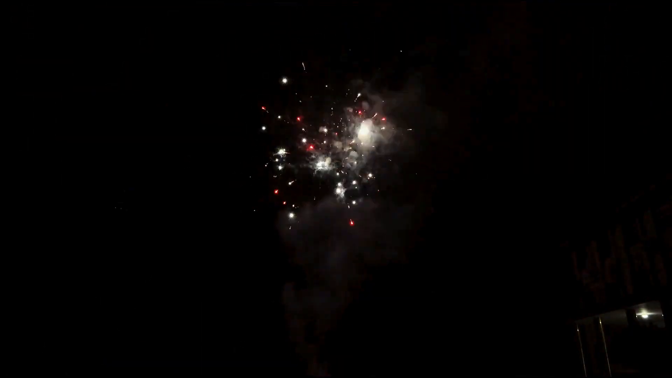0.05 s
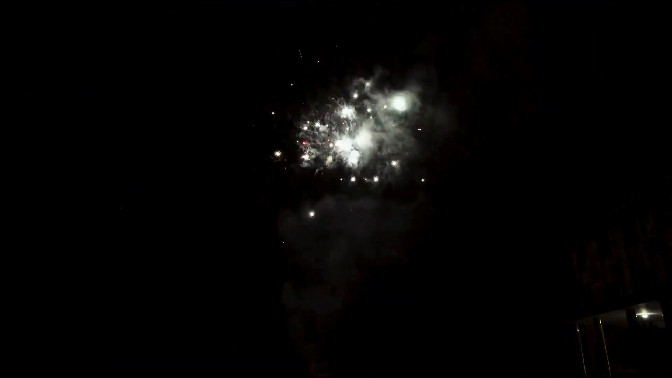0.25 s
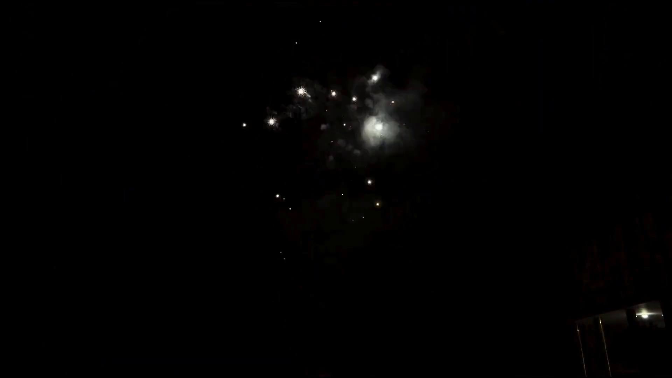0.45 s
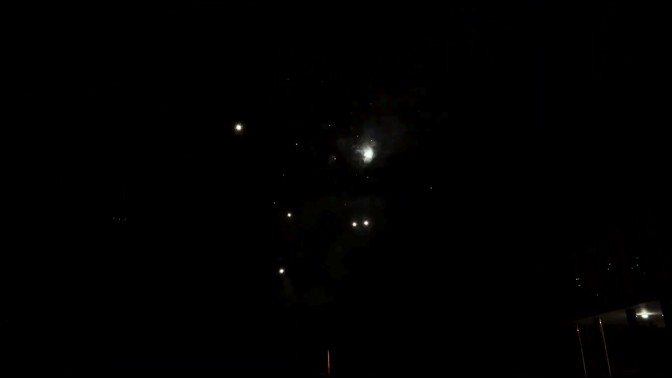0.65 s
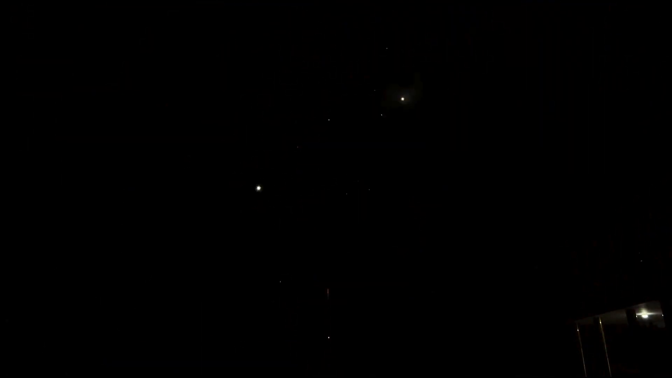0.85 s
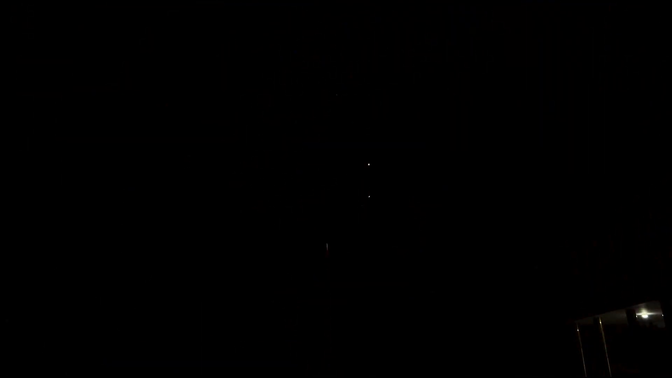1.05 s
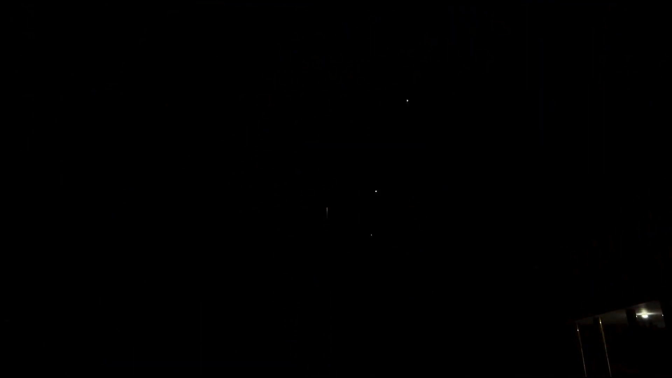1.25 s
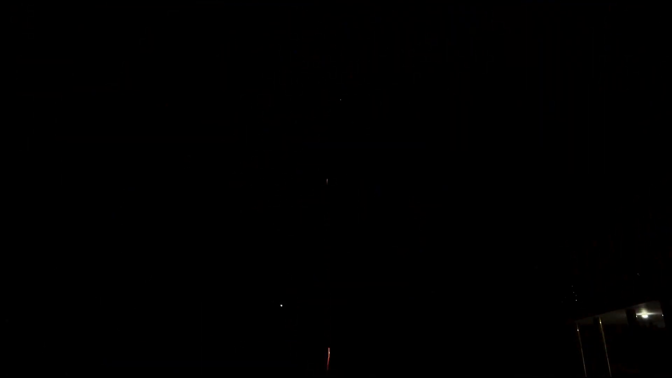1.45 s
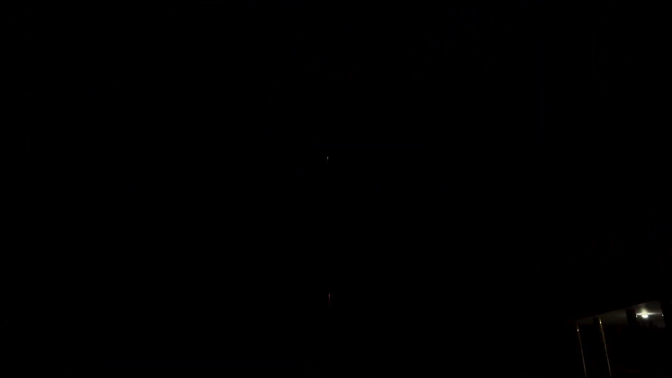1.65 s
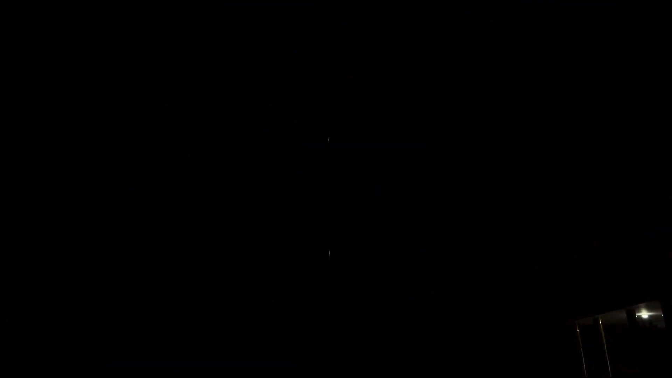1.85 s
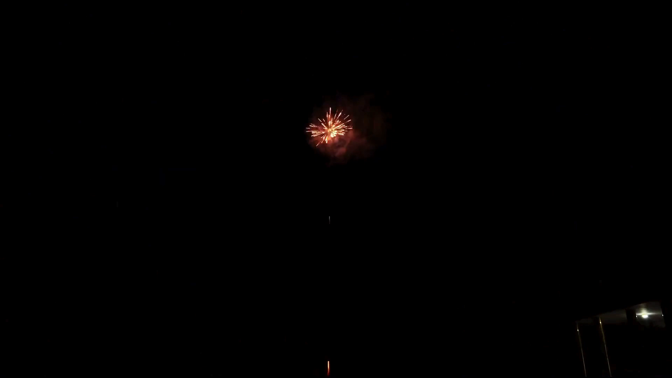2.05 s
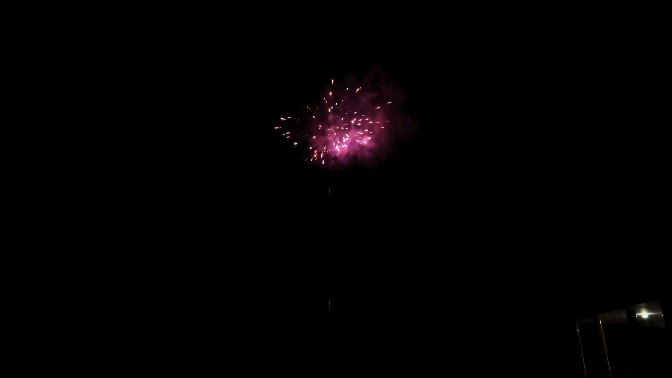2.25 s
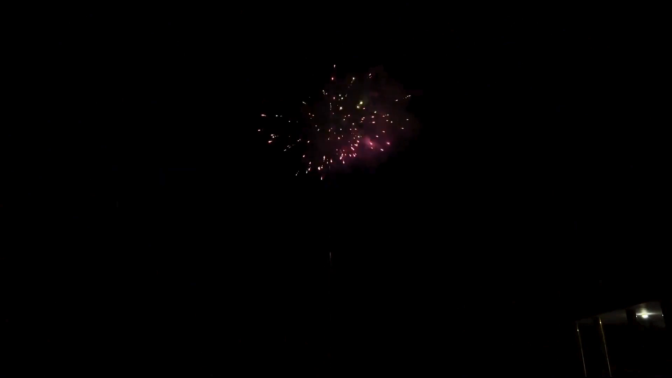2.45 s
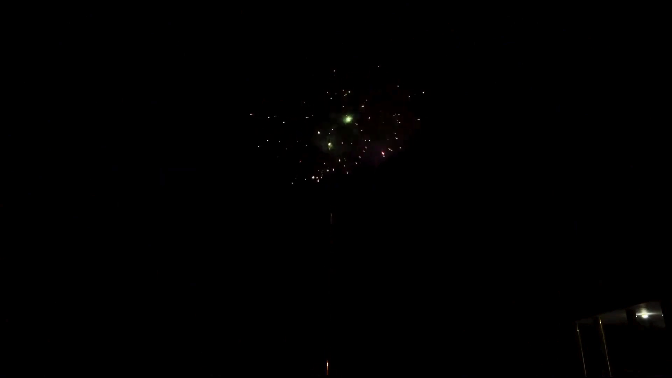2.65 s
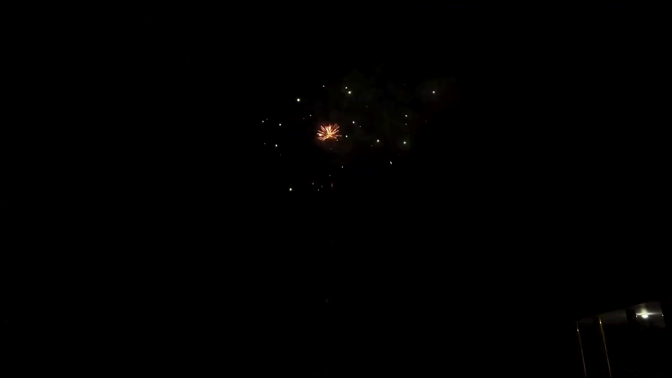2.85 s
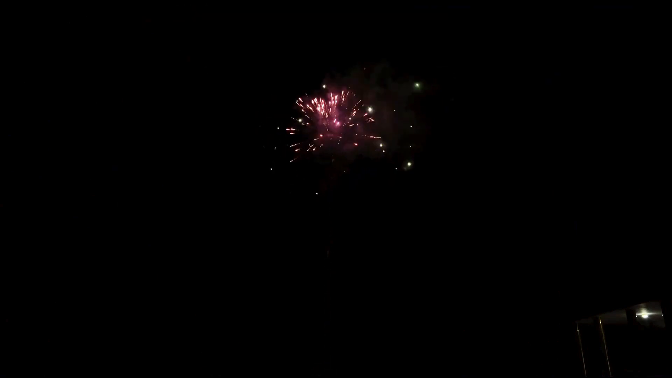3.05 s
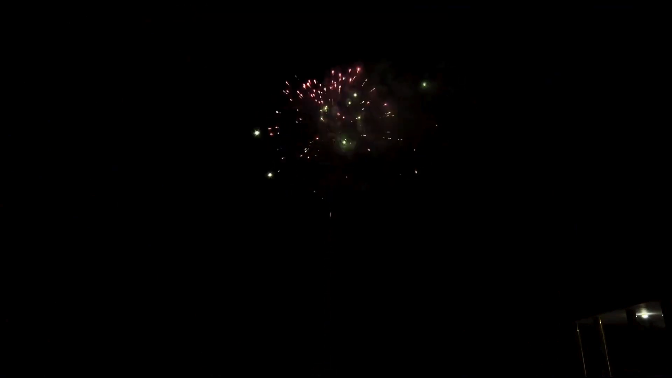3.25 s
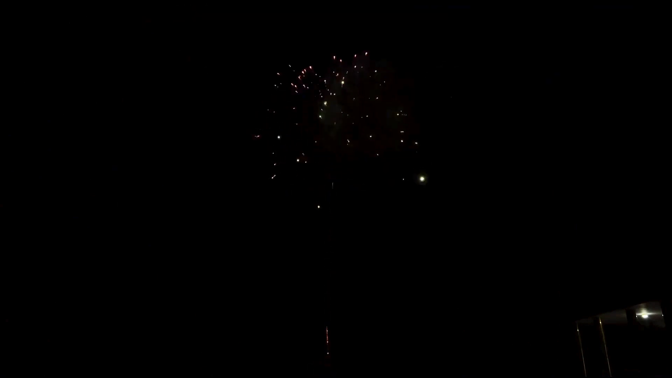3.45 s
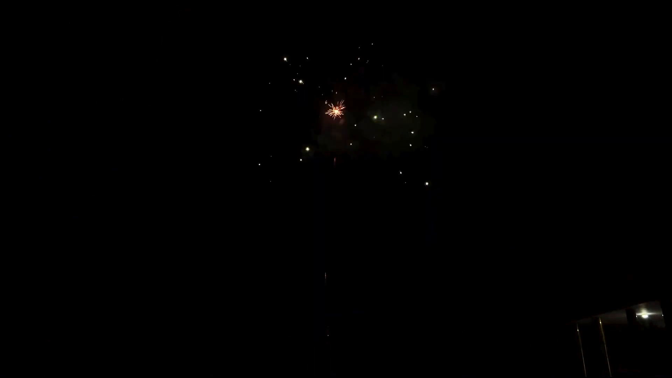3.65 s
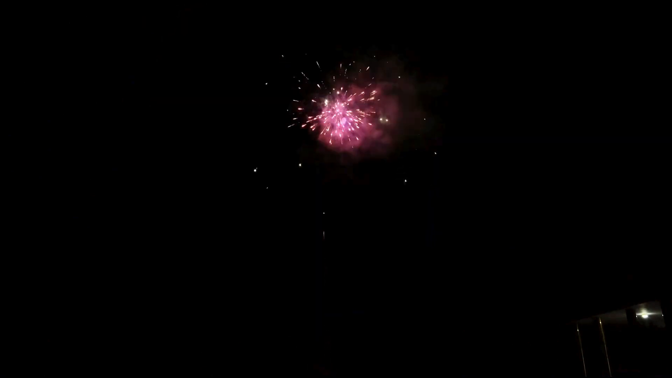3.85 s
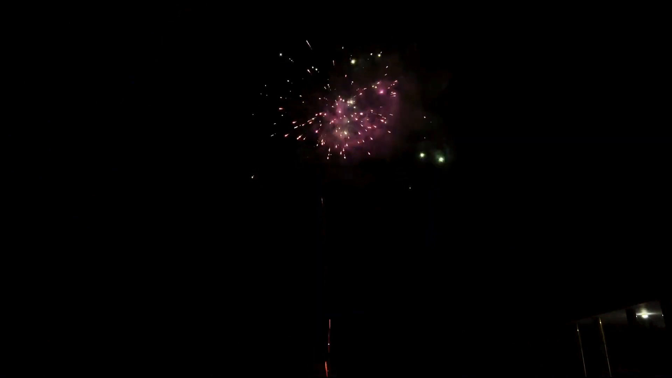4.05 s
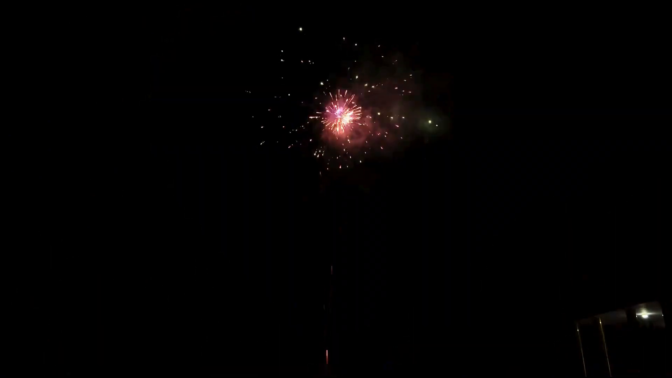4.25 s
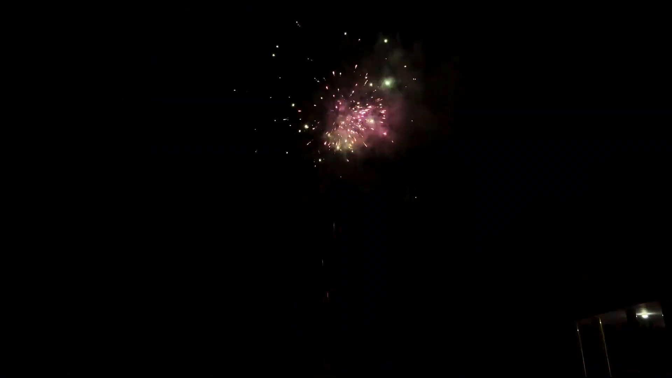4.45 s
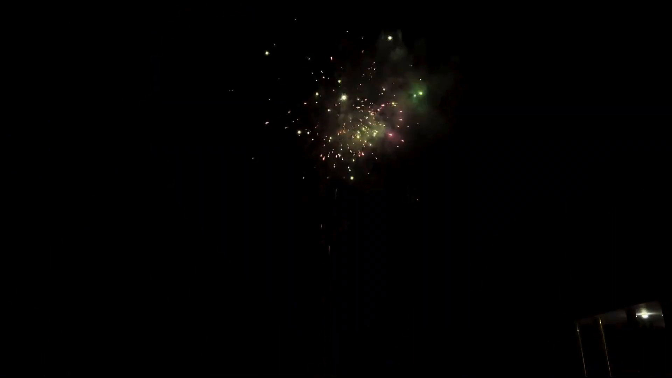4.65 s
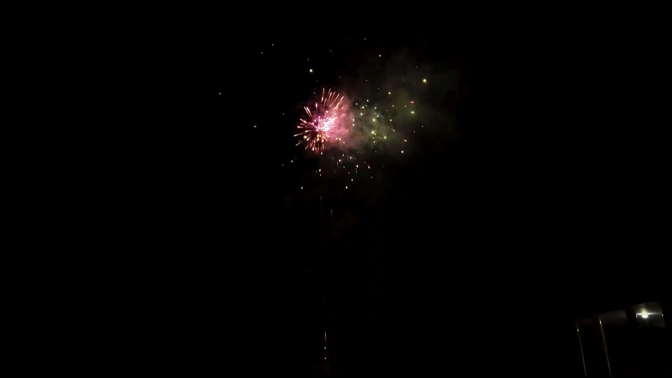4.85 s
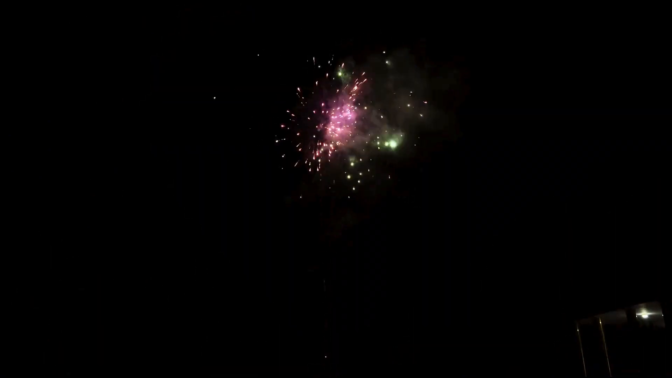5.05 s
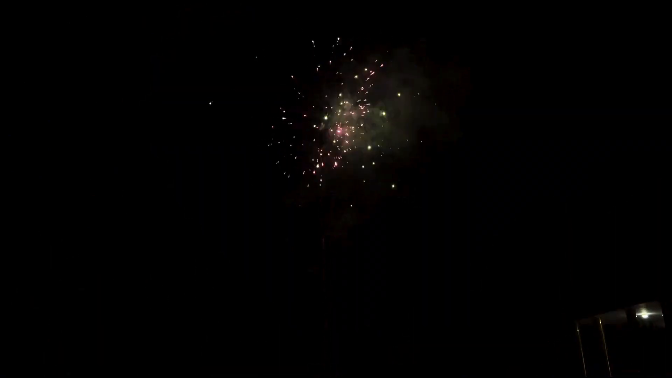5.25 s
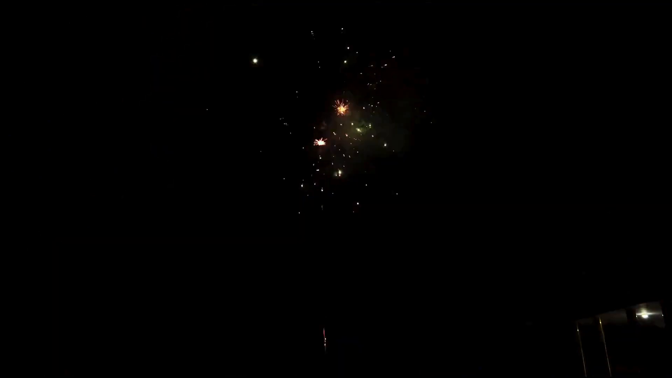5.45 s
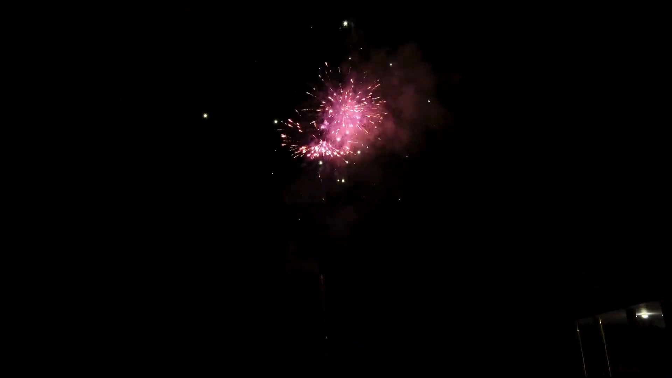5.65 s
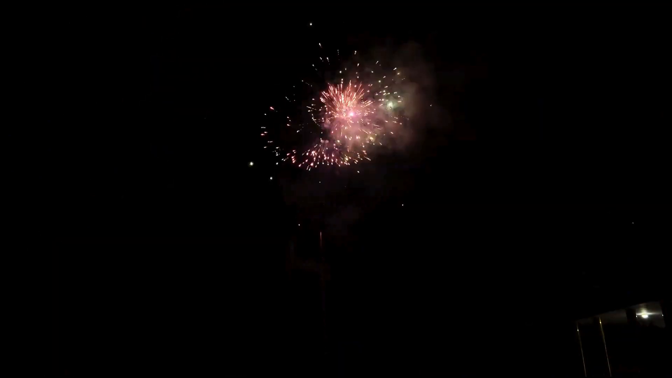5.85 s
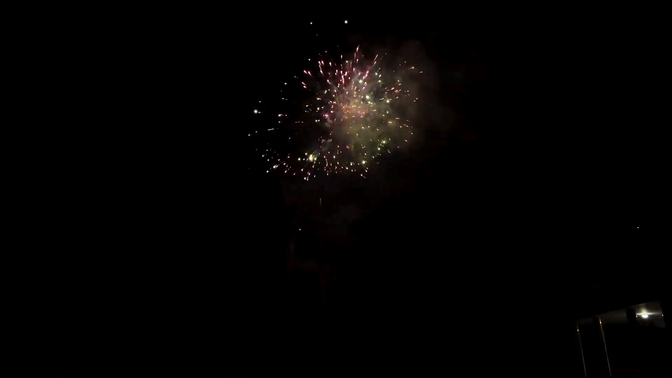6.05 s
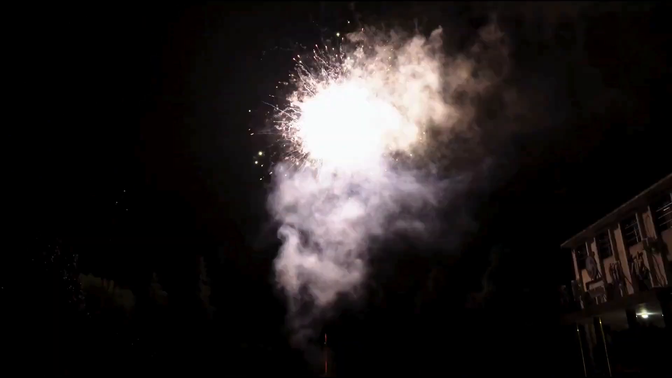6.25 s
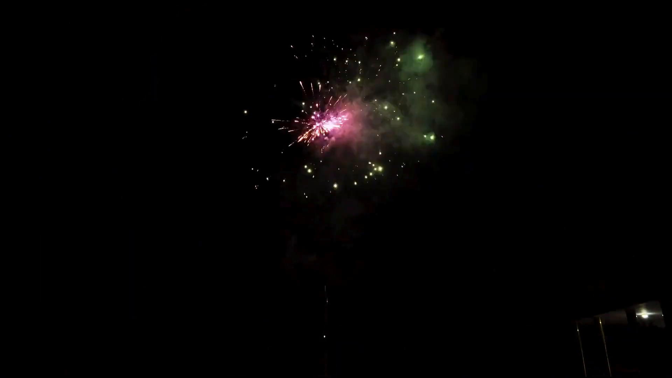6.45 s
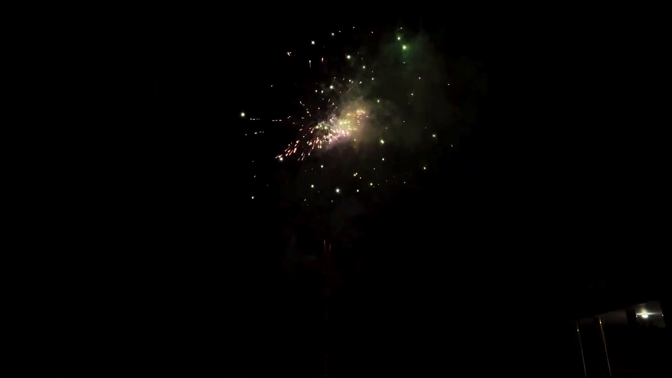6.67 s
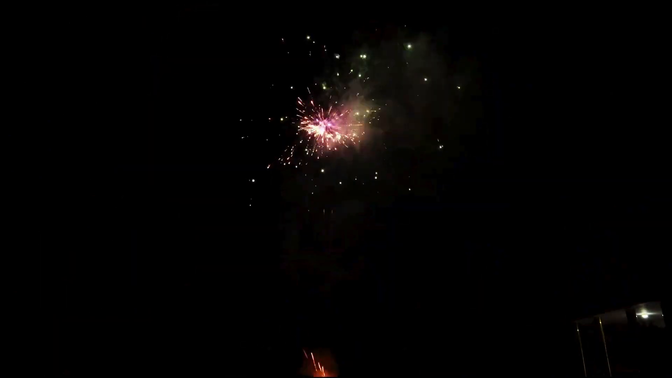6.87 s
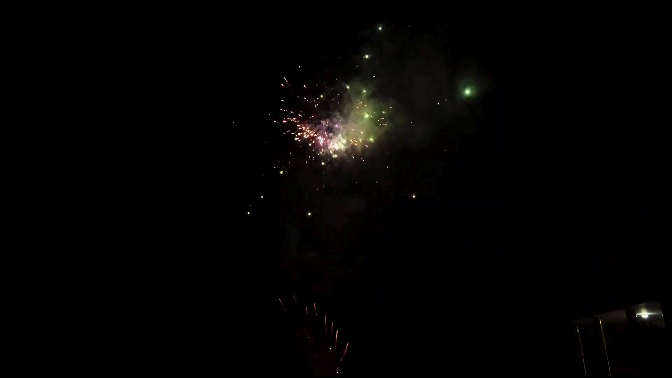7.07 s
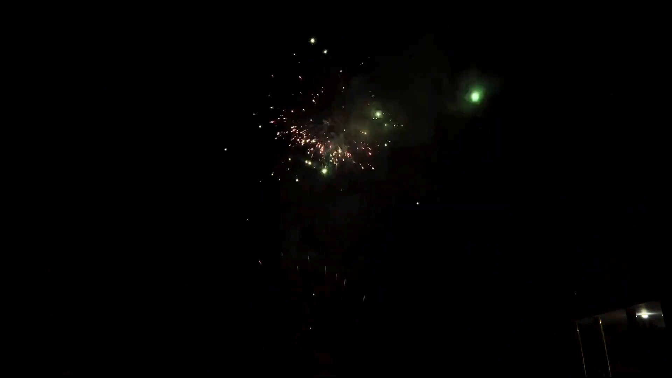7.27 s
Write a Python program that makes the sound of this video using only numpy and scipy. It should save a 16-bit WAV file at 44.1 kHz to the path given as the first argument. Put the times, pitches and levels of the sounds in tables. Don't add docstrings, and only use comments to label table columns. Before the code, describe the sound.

Night, outdoors among blocks of flats, with low distant town hum and faint hiss. At 0 s the rolling echo of earlier shell bursts is dying away. A dry, bright launch crack snaps at 0.8 s, another at 1.6 s, with a very faint high bat trill around 1.5 s. At 2.3 s a crack and a loud, deeper burst overhead come almost together, echoing long. Cracks at 2.9 and 3.6 s alternate with booms at 3.1 and 3.9 s; tiny bat chirps near 3.8 s. From 4.2 s shots crowd closer, with bursts at 4.4, 5.0, a doubled one at 5.75, then 6.0 and 6.6 s. A sharp farther shot hits at 6.5 s, a bat trill at 6.9 s, and from 7.05 s a boom and a rapid rattling volley of about seven shots close it. Close stereo microphones, slightly overloaded, level ducking at each blast, little deep bass.

```python
import sys
import numpy as np
from scipy import signal
from scipy.io import wavfile
from scipy.ndimage import uniform_filter1d, minimum_filter1d

SR = 44100
rng = np.random.default_rng(int(sys.argv[2]) if len(sys.argv) > 2 else 0)


def dump_mix(stems):
    frames = np.atleast_2d(stems).T
    limited = np.clip(frames, -1, 1)
    pcm = np.round(limited * 32767).astype(np.int16)
    wavfile.write(sys.argv[1], SR, pcm)


def voltage_ratio(decibels):
    exponent = np.asarray(decibels, float) / 20
    return 10 ** exponent


N = 322371
LEAD = SR


def read(points, hz):
    f, value = np.transpose(points)
    return np.interp(np.log(hz + 1), np.log(f + 1), value)


def evened(x):
    return x / np.sqrt(np.mean(x ** 2) + 1e-20)


# (frequency [Hz], correlation [-1 to 1])
PORT_LIKENESS = [(60, .92), (130, .99), (290, .94), (640, .78), (1400, .48), (3100, .35), (4800, .2),
                 (6800, .4), (15000, .2)]
# (frequency [Hz], left minus right [dB])
PORT_BALANCE = [(60, 5), (110, 5), (200, -0.5), (380, -0.5), (700, 1.5), (1290, 0), (2380, 2), (4400, 1),
                (8120, 0), (15000, 2)]
# (frequency [Hz], phase lag of the right port [rad])
PORT_PHASE = [(60, 0), (400, -.2), (1550, -.9), (3000, -2.8), (4000, -2.7), (6300, 0), (16400, 0)]


def ports(z, hz):
    same = np.clip(read(PORT_LIKENESS, hz), -1, 1)[:, None]
    lean = voltage_ratio(read(PORT_BALANCE, hz) / 2)[:, None]
    late = np.exp(-1j * read(PORT_PHASE, hz))[:, None]
    left = z[0] * lean
    right = (same * late * z[0] + np.sqrt(1 - same ** 2) * z[1]) / lean
    return np.array([left, right])


# (frequency [Hz], density [dB])
NIGHT_COLOUR = [(24, -75), (40, -47), (600, 4.5), (1400, -11), (4000, -22), (8000, -24.5), (12000, -28),
                (15300, -25), (16500, -37)]


def night():
    floor_db = -50
    hz = np.fft.rfftfreq(1024, 1 / SR)
    real, imaginary = rng.standard_normal((N // 256 + 5, 513, 2, 2)).T
    z = ports(real + 1j * imaginary, hz) * voltage_ratio(read(NIGHT_COLOUR, hz))[:, None]
    noise = signal.istft(z, nperseg=1024, noverlap=768)[1][:, :N]
    return voltage_ratio(floor_db) * evened(noise)


# (start [s], chirp rate [1/s], top [Hz], bottom [Hz], level [dB])
BAT_TRILLS = [
    (1.468, 57, 16200, 13700, -51),
    (3.828, 110, 14000, 12800, -55),
    (3.838, 110, 12400, 11100, -58),
    (3.864, 120, 15800, 14200, -54),
    (6.9275, 121, 16200, 10600, -38),
]


def bats():
    trill_s = .047
    direct = np.zeros(N)
    for start, per_s, top_hz, bottom_hz, db in BAT_TRILLS:
        u = np.linspace(0, 1, round(.7 * SR / per_s))
        hz = bottom_hz + (top_hz - bottom_hz) * (1 - u) ** 1.4
        chirp = np.sin(2 * np.pi * np.cumsum(hz) / SR) * np.sin(np.pi * u)
        times = np.arange(start, start + trill_s, 1 / per_s)
        clicks = np.zeros(N)
        np.add.at(clicks, np.round(times * SR).astype(int), voltage_ratio(db))
        direct += signal.oaconvolve(clicks, chirp)[:N]
    wall = voltage_ratio(-3) * np.roll(direct, round(.006 * SR))
    return direct + wall * np.array([[1], [-1]])


def roll(colour, t60, blocks, near_t60, far_db, rise_s, uneven_db):
    size, echoes_per_s = 2 * SR, 5000
    taps = rng.choice([-1., 1.], (2, size)) * (rng.random((2, size)) < echoes_per_s / SR)
    taps = taps * voltage_ratio(uneven_db * np.minimum(rng.exponential(1, (2, size)), 3))
    hz, t, z = signal.stft(taps, SR, nperseg=512)
    near_power = voltage_ratio(-120 * t / near_t60)
    far_power = voltage_ratio(2 * far_db - 120 * t / read(t60, hz)[:, None])
    decay = np.sqrt(near_power + far_power)
    swell_db = sum(db * np.exp(-.5 * ((t - s) / spread) ** 2) for s, spread, db in blocks)
    lumps = uniform_filter1d(rng.standard_normal(z.shape[1:]), size=6, axis=0)
    lumps = evened(uniform_filter1d(lumps, size=3, axis=1))
    swell_db = swell_db + 1.8 * lumps
    shape_db = read(colour, hz)[:, None] + swell_db / (1 + (hz[:, None] / 2500) ** 2)
    tail = signal.istft(ports(z, hz) * decay * voltage_ratio(shape_db), SR, nperseg=512)[1][:, :size]
    t = np.arange(size) / SR
    early_rms = np.sqrt(np.mean(tail[:, :SR // 10] ** 2))
    return tail / early_rms * (1 - np.exp(-(t / rise_s) ** 2))


# (frequency [Hz], density [dB])
YARD_COLOUR = [(24, -73), (40, -36), (349, -4.5), (536, -4), (957, -5), (1060, -4.5), (1470, -0.5),
               (9010, -22.5), (14900, -39.5), (16500, -58)]
# (frequency [Hz], t60 [s])
YARD_T60 = [(150, 1.6), (500, 2.33), (1500, 1.93), (4000, 1.52), (10000, 1.2)]
# (time after blast [s], spread [s], level [dB])
YARD_BLOCKS = [(.04, 0.024, 4.5), (.065, 0.03, -3), (.135, 0.023, 0), (.2, .02, 2.5), (.31, 0.01, 1)]


def yard_roll():
    return roll(YARD_COLOUR, YARD_T60, YARD_BLOCKS, near_t60=.35, far_db=-12, rise_s=.006, uneven_db=2.5)


# (frequency [Hz], density [dB])
SKY_COLOUR = [(24, -78), (40, -44), (81, -35.5), (324, -7.5), (823, -5), (1200, -10), (3550, -13),
              (7180, -15.5), (12500, -23), (15300, -31.5), (16500, -72)]
# (frequency [Hz], t60 [s])
SKY_T60 = [(150, 2.26), (500, 3.17), (1500, 3.26), (4000, 1.975), (10000, 1.01)]
# (time after blast [s], spread [s], level [dB])
SKY_BLOCKS = [(.02, 0.0042, 4.5), (.048, 0.0019, 11.5), (.07, 0.014, 2), (.1, 0.0092, -3), (.155, 0.12, 5),
              (.22, 0.0094, -3)]


def sky_roll():
    return roll(SKY_COLOUR, SKY_T60, SKY_BLOCKS, near_t60=.91, far_db=-.06, rise_s=.013, uneven_db=1.68)


def front(colour):
    log_gain = np.log(voltage_ratio(read(colour, abs(np.fft.fftfreq(4096, 1 / SR)))))
    minimum_phase = np.exp(log_gain - 1j * signal.hilbert(log_gain).imag)
    pulse = np.fft.ifft(minimum_phase).real[:1024]
    return -pulse / abs(pulse).max()


def tube_ring(pitch):
    tube_hz, tube_t60 = 2060, .017
    t = np.arange(1024) / SR
    return -np.cos(2 * np.pi * tube_hz * np.sqrt(pitch) * t) * voltage_ratio(-60 * t / tube_t60)


def wall_paths(walls):
    paths = np.zeros((2, 4096))
    for left_ms, right_ms, left_db, right_db, dull_hz in walls:
        smear = np.exp(-2 * np.pi * dull_hz * np.arange(64) / SR)
        for path, ms, db in zip(paths, (left_ms, right_ms), (left_db, right_db)):
            path[round(ms * SR / 1000):][:64] += voltage_ratio(db) * smear / smear.sum()
    return paths


def near_paths(near, pitch, stray):
    rim_ms = .16
    paths = np.zeros((2, 256))
    paths[:, 0] = 1
    paths[:, round(rim_ms * SR / 1000)] += (.08, -.2)
    for (ms, db), (both, apart) in zip(near, stray):
        at_ms = ms / pitch + .05 * both + .04 * apart * np.array([1, -1])
        paths[[0, 1], np.round(at_ms * SR / 1000).astype(int)] += voltage_ratio(db)
    return paths


def blasts(rows, colour, walls, walls_db, near, echo_roll):
    paths = wall_paths(walls)
    straight = np.arange(4096) == 0
    out = np.zeros((2, N + LEAD))
    strays = rng.uniform(-1.5, 1, (len(rows), len(near), 2))
    for (s, front_db, charge_db, pitch, *ring_db), stray in zip(rows, strays):
        pulse = front(np.array(colour) * (pitch, 1))
        pulse = pulse + sum(voltage_ratio(db) * tube_ring(pitch) for db in ring_db)
        pulse = signal.fftconvolve(pulse[None], near_paths(near, pitch, stray), axes=1)
        arrivals = voltage_ratio(front_db) * straight + voltage_ratio(charge_db + walls_db) * paths
        sound = signal.fftconvolve(arrivals, pulse, axes=1)
        part = out[:, round(s * SR) + LEAD - 1:][:, :sound.shape[1]]
        part += sound[:, :part.shape[1]]
    rolls = [echo_roll() for _ in range(4)]
    for k, (s, _, charge_db, *_) in enumerate(rows):
        part = out[:, round(s * SR) + LEAD:][:, :2 * SR]
        part += voltage_ratio(charge_db) * rolls[k % 4][:, :part.shape[1]]
    return out[:, LEAD:]


# (time [s], front level [dB], charge level in the roll [dB], pitch of the front [factor])
FAR_SHOTS = [
    (6.4606, 5, -24.5, 0.826),
    (7.0835, -18, -28, 0.72),
    (7.1037, -10, -33, 0.91),
    (7.1252, -3, -25, 0.92),
    (7.1512, -3, -24, 0.83),
    (7.1811, 1.5, -20.5, 0.84),
    (7.2087, 0, -25, 0.64),
    (7.2303, 3, -24, 0.9),
]
# (frequency [Hz], density [dB])
FAR_FRONT = [(40, -45), (300, -31), (1200, -12.5), (2200, -3.5), (3300, -6.5), (4500, -6), (5400, -2.5),
             (6500, -12.5), (10000, -24), (16500, -41)]
# (left [ms], right [ms], left level [dB], right level [dB], dull above [Hz])
FAR_WALLS = [(7.24, 7.37, 1, -2, 20000), (11.36, 10, -14, -14, 2000)]
# (delay [ms], level [dB])
FAR_NEAR = [(0.549, -17), (1.25, -8)]


def far_row():
    return blasts(FAR_SHOTS, FAR_FRONT, FAR_WALLS, 25.5, FAR_NEAR, yard_roll)


# (time [s], front level [dB], charge level in the roll [dB], pitch [factor], ring under front [dB])
TUBE_SHOTS = [(.8399, 10, -21, 1.12, -18), (1.6204, 8.5, -23, 1.1, -13.5), (2.271, 4.5, -24, 1.15, -17),
              (2.863, 5.5, -21.5, 1.1, -15), (3.5684, 8, -23, 1.06, -21), (4.1562, 6.5, -23, 0.904, -26),
              (4.2681, 6, -25.5, 0.81, -27), (4.4397, 7, -21, 0.88, -22), (4.9663, 5.5, -22, 0.97, -18),
              (5.5787, 7.5, -19, 0.86, -8.5), (6.368, 0, -21, 0.8, -5.5)]
# (frequency [Hz], density [dB])
TUBE_FRONT = [(40, -49), (300, -17), (1200, -3.5), (2000, 0), (3000, 0), (4800, 1.5), (6500, -5),
              (9000, -11.5), (12800, -16), (16500, -38)]
# (left [ms], right [ms], left level [dB], right level [dB], dull above [Hz])
TUBE_WALLS = [(7.24, 7.37, 0, -4, 15000), (11.36, 10, -8, -10, 3600), (11.86, 11.5, -14, -8, 1800),
              (33.5, 55, -13, -19, 1700)]
# (delay [ms], level [dB])
TUBE_NEAR = [(0.411, -14), (.7, -12), (1.1, -16.5), (1.5, -9.5)]


def tubes():
    return blasts(TUBE_SHOTS, TUBE_FRONT, TUBE_WALLS, 22, TUBE_NEAR, yard_roll)


# (time [s], front level [dB], charge level in the roll [dB], pitch of the front [factor])
SHELL_BURSTS = [(-.45, 3, -9.5, 1.01), (-.2, 3, -17.5, 1.01), (2.2843, 13, -15, 1.32),
                (3.1266, 11, -16, 1.09), (3.945, 10.5, -15.5, 1.1), (4.4448, 11.5, -16.5, 1.06),
                (5.0291, 9, -15, 1.15), (5.7483, 13, -15, 1.15), (5.7626, 7, -20.5, 0.95),
                (6.033, 11, -16.5, 1.22), (6.5761, 10.5, -16.5, 1.1), (7.0432, 6.5, -17, 1.14)]
# (frequency [Hz], density [dB])
SHELL_FRONT = [(40, -64), (200, -8.5), (450, 5), (700, 9), (1000, -1), (1500, -0.5), (2500, -4.5),
               (4500, -10.5), (9000, -12.5), (16500, -31)]
# (left [ms], right [ms], left level [dB], right level [dB], dull above [Hz])
SHELL_WALLS = [(1.45, 1.4, -4, -5, 1300), (3.87, 3.82, -7, -8, 12000), (5.35, 5.3, -6, -6, 1100),
               (6.4, 6.4, -2.5, -3.5, 5000), (10.6, 10.7, -10, -12, 1200), (22.5, 22.6, -11, -12, 1500),
               (42.3, 42.1, -7, -8, 3000)]
# (delay [ms], level [dB])
SHELL_NEAR = [(.7, -9), (.98, -11)]


def shells():
    return blasts(SHELL_BURSTS, SHELL_FRONT, SHELL_WALLS, 24.5, SHELL_NEAR, sky_roll)


def scene():
    return night() + bats() + far_row() + tubes() + shells()


def band_db(z):
    return 10 * np.log10((abs(z) ** 2).sum(0) + 1e-12)


def starved(x, loud_db, per_db, per_octave, side_db, side_per_db):
    hz, t, z = signal.stft(np.array([x[0] + x[1], x[0] - x[1]]) / 2, SR, nperseg=1024)
    band = np.arange(len(hz)) // 11
    level_db = band_db(z[0])
    top_db = band_db(z[0, 70:])
    high_db = band_db(z[0, 270:])
    top_steady = top_db < minimum_filter1d(top_db, size=5) + 6
    high_steady = high_db < minimum_filter1d(high_db, size=11) + 7
    chance = rng.standard_normal((2, band[-1] + 1, len(t)))
    chance = evened(uniform_filter1d(chance, size=4, axis=2))[:, band]
    octaves = np.log2(hz[:, None] / 11000 + 1e-3)
    mid_need = per_db * np.minimum(level_db - loud_db, 0) + per_octave * np.minimum(octaves, .08)
    side_need = side_per_db * (side_db - level_db) + .27 * octaves
    muted = (chance < np.array([mid_need, side_need])) & top_steady & high_steady & (hz[:, None] > 6300)
    mid, side = signal.istft(z * np.where(muted, .02, 1), SR, nperseg=1024)[1][:, :N]
    return np.array([mid + side, mid - side])


def top_cut(x):
    return signal.sosfilt(signal.butter(12, 16820, fs=SR, output="sos"), x)


def record(dry):
    thin = signal.sosfilt(signal.butter(3, 110, "highpass", fs=SR, output="sos"), dry)
    peak_db = 20 * np.log10(abs(thin).max(0) + 1e-9)
    fall = np.arange(N) * 122.0 / SR
    held_db = np.maximum.accumulate(peak_db + fall) - fall
    over_db = np.maximum(held_db - 1.0, 0)
    ducked = thin / voltage_ratio(.46 * uniform_filter1d(over_db, size=16))
    thump = signal.lfilter([1, -1], [1, -.998], ducked ** 2)
    lopsided = ducked + .033 * thump
    ceiling = .9
    rounded = ceiling * lopsided / (1 + abs(lopsided) ** 6) ** (1 / 6)
    lowpass = signal.firwin(255, 16300, window=("kaiser", 9), fs=SR)
    band = signal.oaconvolve(rounded, lowpass[None], "same")
    mix = starved(band, loud_db=-35, per_db=.17, per_octave=6, side_db=-24, side_per_db=.07)
    return top_cut(mix)


dry = scene()
out = record(dry)
dump_mix(out)
```